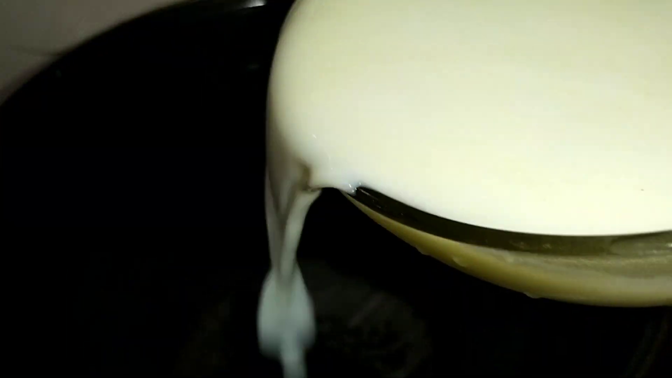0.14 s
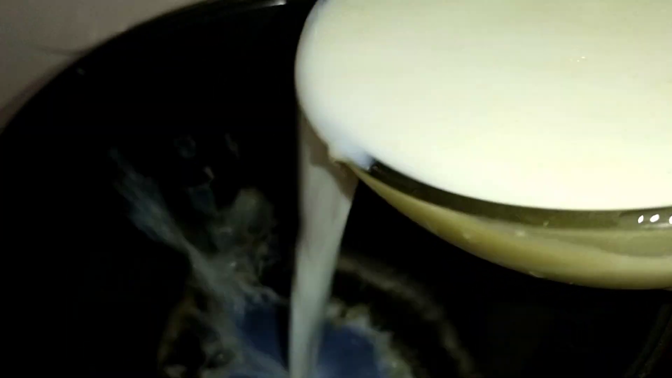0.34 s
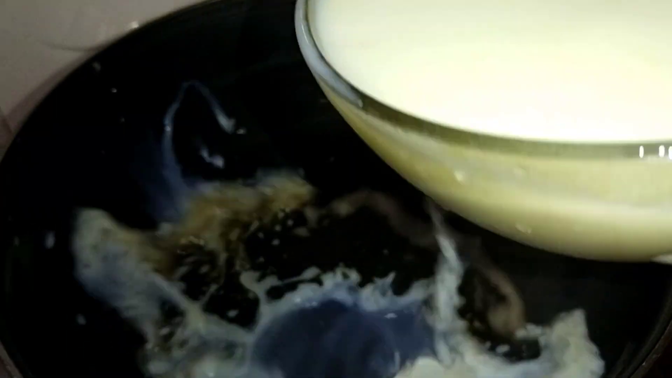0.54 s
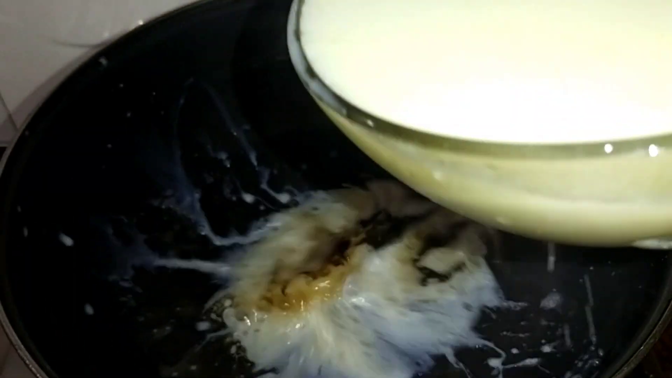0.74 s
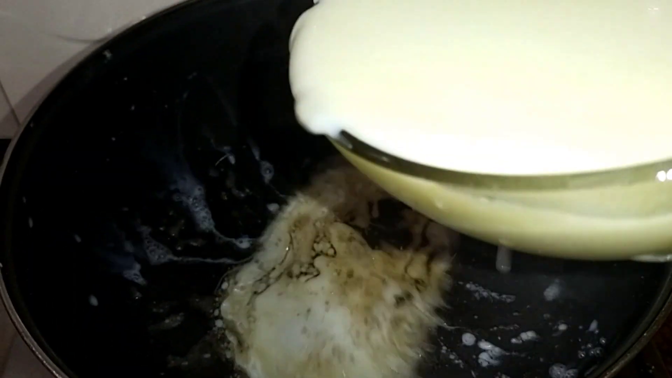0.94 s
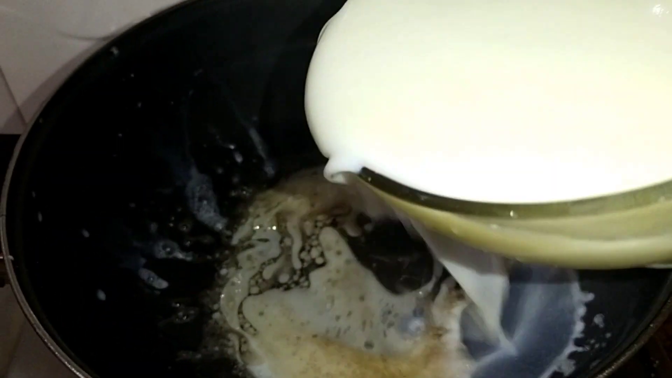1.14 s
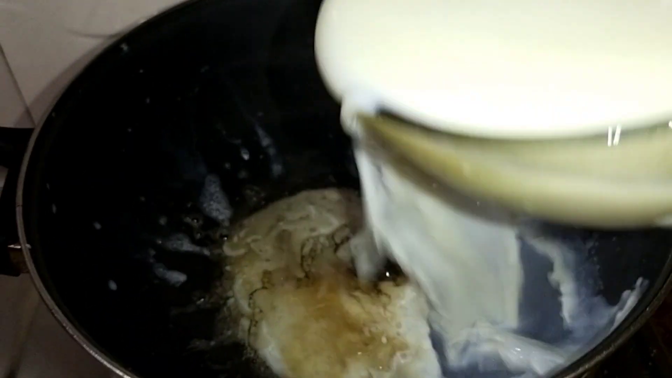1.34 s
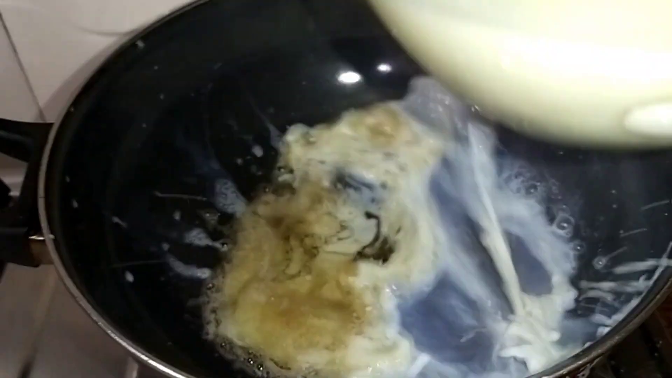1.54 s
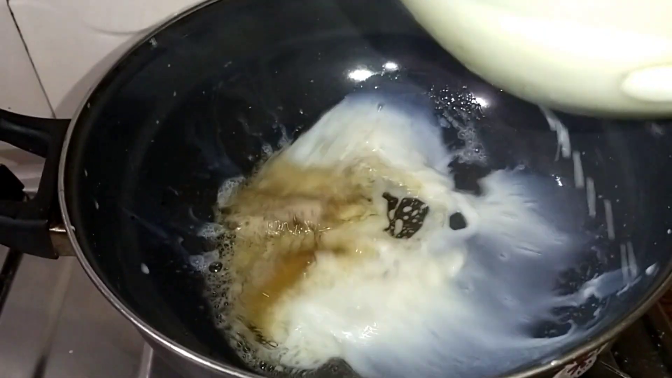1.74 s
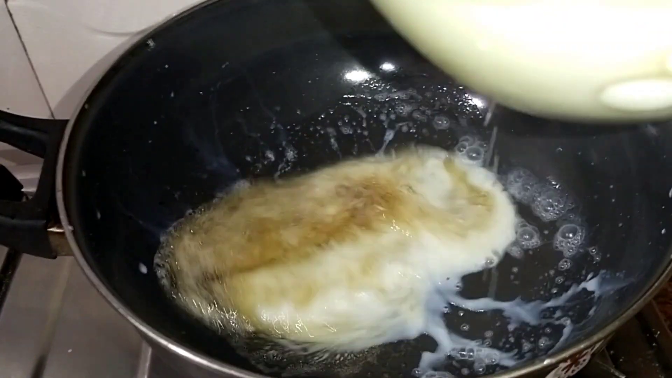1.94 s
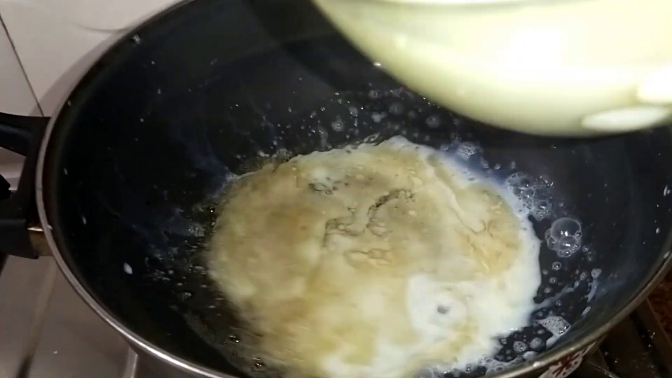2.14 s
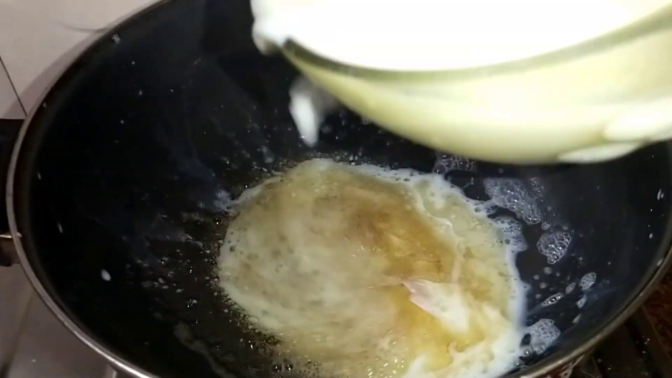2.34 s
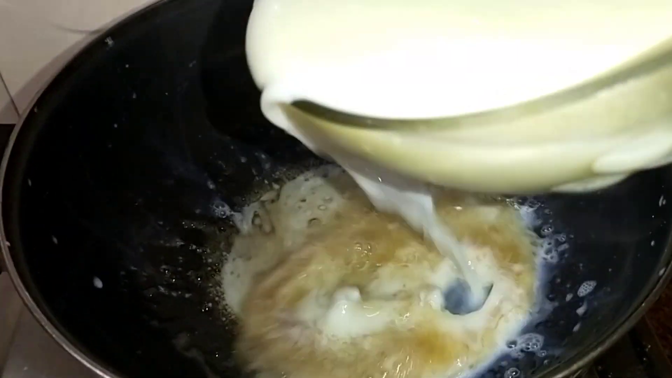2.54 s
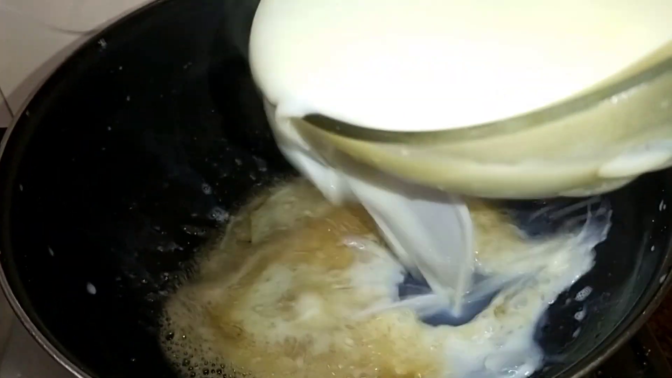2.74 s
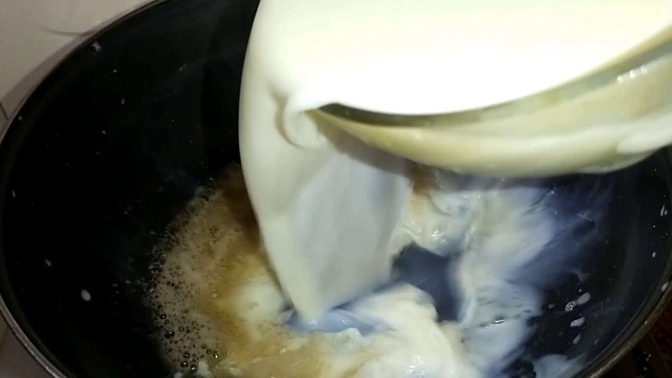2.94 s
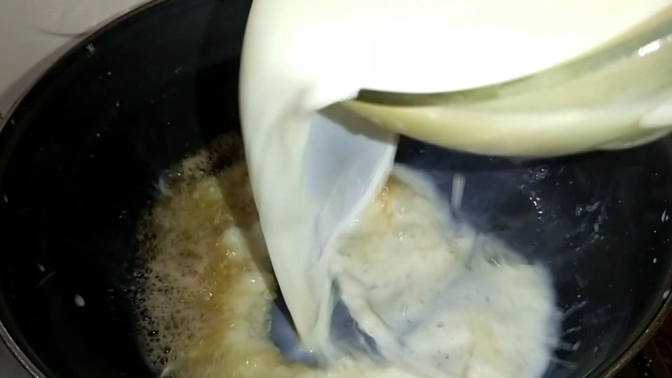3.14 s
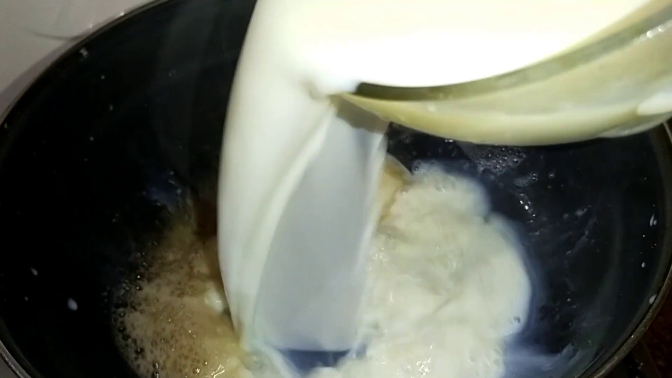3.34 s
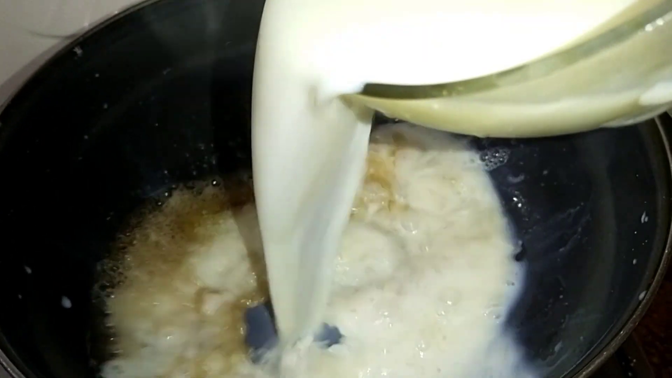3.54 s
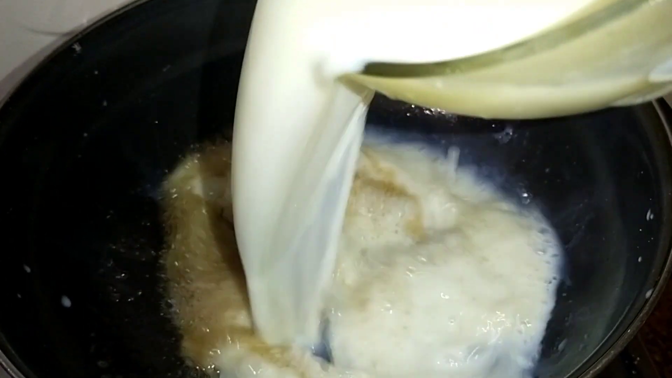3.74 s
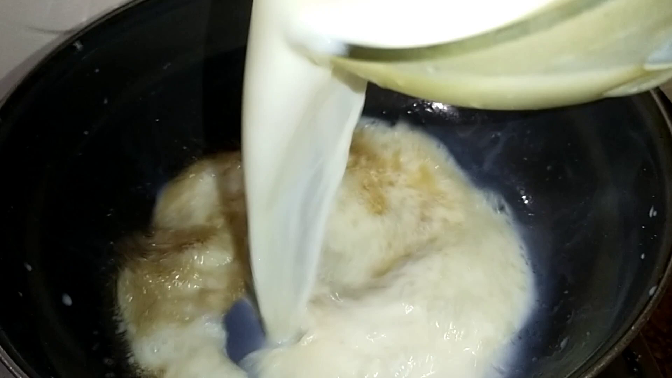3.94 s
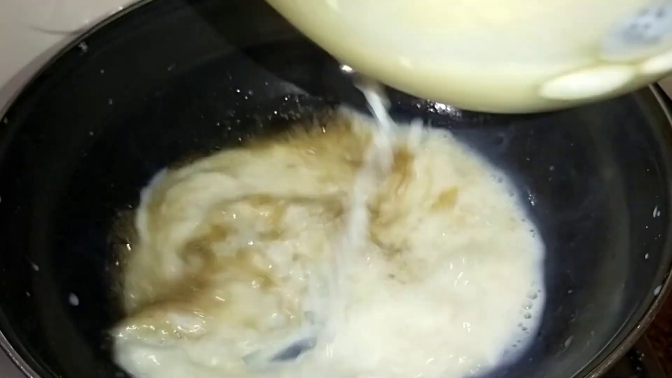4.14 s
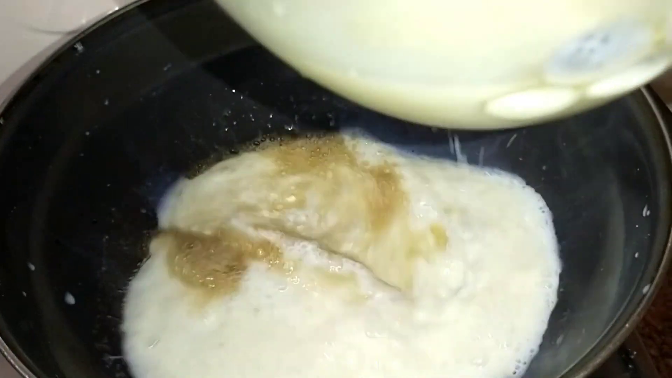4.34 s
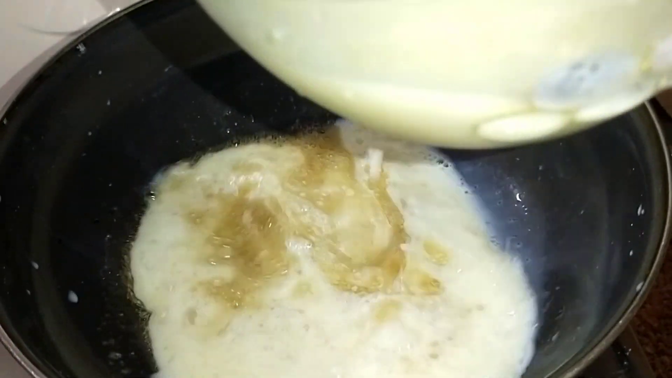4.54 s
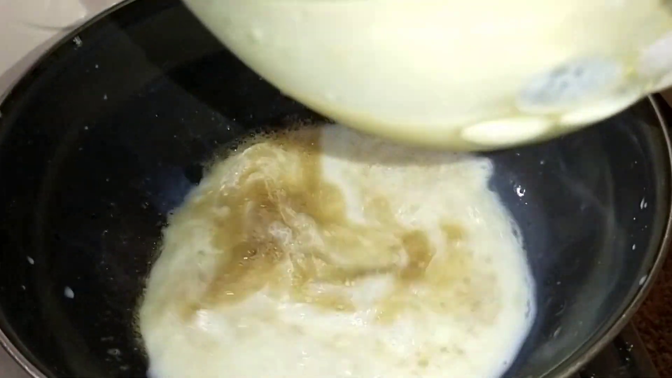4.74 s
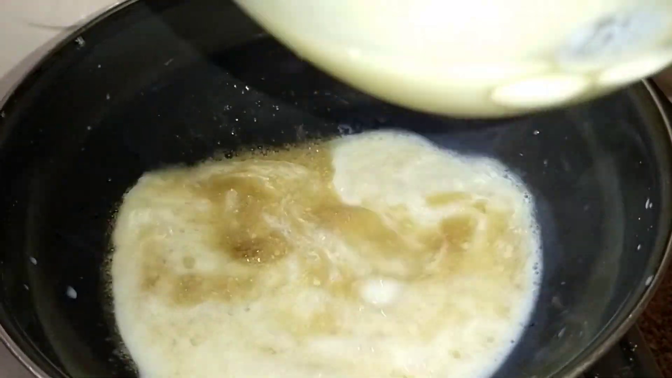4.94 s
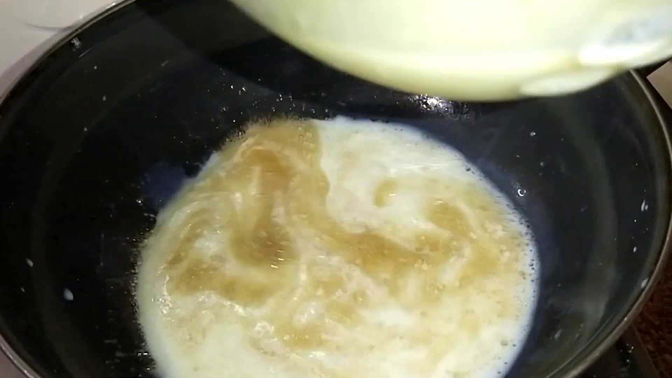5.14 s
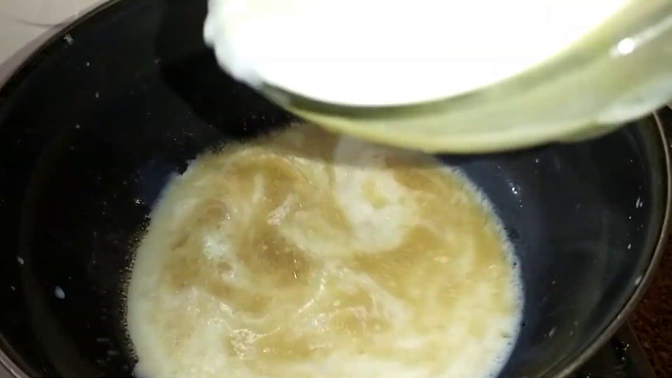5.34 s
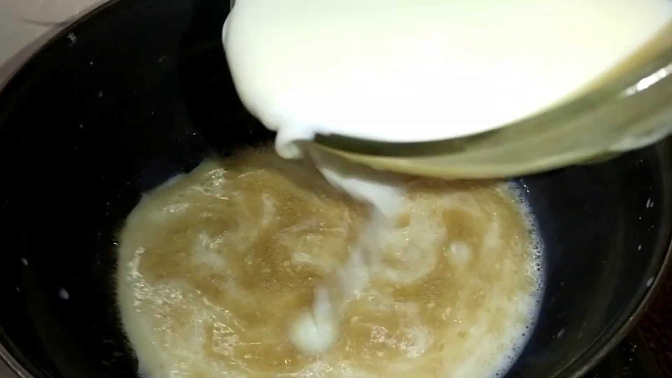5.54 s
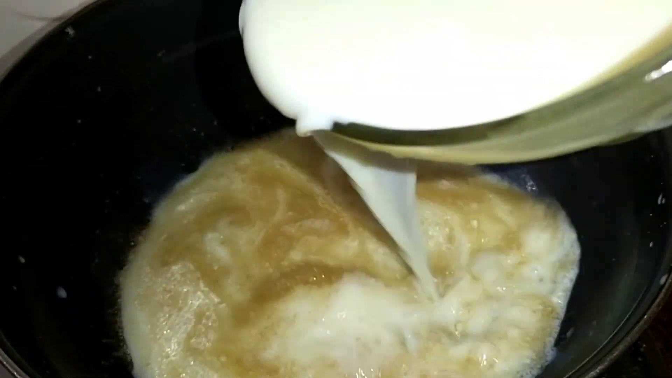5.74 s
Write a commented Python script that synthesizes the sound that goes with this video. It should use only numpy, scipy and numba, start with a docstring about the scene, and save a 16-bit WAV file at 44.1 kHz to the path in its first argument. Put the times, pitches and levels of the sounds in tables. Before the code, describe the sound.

A few isolated ticks, then milk meets hot ghee in a wok and a dense, bright sizzle bursts up within half a second. Sharp spits and low bubbling peak around one second, flare again with later pours, then die to a thin fizz with separate snaps over a faint stove drone. Very close stereo microphone, small hard-walled kitchen.

```python
"""Milk poured into hot ghee

Milk runs in several goes into a wok of hot ghee, close to two microphone ports in a small kitchen.
Droplets flash to steam and spit, a dense fizz spreads over the metal, and larger bubbles boil and ring the wok.
Most sounds are short damped rings or bursts of filtered noise, placed by tables or at random.
As the milk cools the pan the boiling dies away, leaving fizz and lone spits over the low drone of the stove."""
import sys
import numpy as np
from scipy import signal
from scipy.fft import rfft, irfft
from scipy.io import wavfile
from numba import njit

SR = 44100
rng = np.random.default_rng(int(sys.argv[2]) if len(sys.argv) > 2 else 0)


def generate_wav(signal):
    """Clip the signal to [-1, 1] and save it as 16-bit WAV at the path in sys.argv[1]."""
    frames = np.transpose(np.atleast_2d(signal))
    scaled = np.clip(frames, -1, 1) * 32767
    pcm = np.round(scaled).astype(np.int16)
    wavfile.write(sys.argv[1], SR, pcm)


N = 255603
TIME = np.arange(N) / SR  # seconds
WETTING_S = 0.33  # when the stream has wetted the pan
LEFT_LEAD_S = 0.0001  # the pan lies a little nearer to the left port


def undb(db):
    """Turn decibels into gain."""
    return 10 ** (np.asarray(db) / 20)


def unit(x):
    """Scale a sound to an average (rms) strength of 1."""
    return x / np.sqrt(np.mean(x ** 2))


def colour(x, points):
    """Shape the tone of two channels through (Hz, dB) points, with a filter that never sounds early."""
    hz, db = np.transpose(points)
    size = 2048
    grid_hz = np.arange(size // 2 + 1) * SR / size
    gain = undb(np.interp(np.log(grid_hz + 1), np.log(hz), db))
    # folding the cepstrum (spectrum of the log gain) puts the filter's energy at its start
    cepstrum = irfft(np.log(gain))
    cepstrum[1:size // 2] *= 2
    cepstrum[size // 2 + 1:] = 0
    response = irfft(np.exp(rfft(cepstrum)))
    return signal.fftconvolve(x, response[None], axes=1)[:, :N]


def resonate(x, hz, width):
    """Let through a band of this width in Hz, with gain 1 at its centre."""
    return signal.lfilter(*signal.iirpeak(hz, hz / width, fs=SR), x)


def walk(rate):
    """Random wander with a spread near 1, heading for a new value `rate` times a second."""
    return np.interp(TIME * rate, np.arange(4096), rng.standard_normal(4096))


@njit
def rings(start, hz, cycles, size, glide):
    """Sum of damped sines: each falls to 1/e in its cycles of hz; its pitch rises (falls if glide < 0)."""
    out = np.zeros(N)
    for k in range(len(start)):
        life = cycles[k] / hz[k]
        first = max(int(start[k] * SR) + 1, 0)
        last = min(int((start[k] + 6 * life) * SR), N)
        for i in range(first, last):
            t = i / SR - start[k]
            phase = 2 * np.pi * hz[k] * t * (1 + glide * t / life)
            out[i] += size[k] * np.exp(-t / life) * np.sin(phase)
    return out


def bubbles(count, low_hz, high_hz, cycles, scatter, linger_s, spread_s, glide):
    """Bubbles burst in clusters of six of like pitch; each cluster has its own place and lag between ports."""
    when, pitch, place, lean, vigour = np.repeat(rng.random((count, 5)), 6, axis=0).T
    late, detune, length, strength = rng.random((len(when), 4)).T
    start = when * N / SR - linger_s * np.log(1 - late)
    hz = low_hz * (high_hz / low_hz) ** pitch * (0.9 + 0.2 * detune)
    hz = np.minimum(hz, SR * 0.45)
    # with scatter above 0 a few bubbles are much louder than the rest, below 0 a few are much softer
    size_db = -scatter * (np.log(strength + 0.02) + np.log(vigour + 0.05))
    size = undb(size_db) * rng.choice([-1, 1], len(when))
    lag = LEFT_LEAD_S / 2 + (2 * place - 1) * spread_s
    return np.array([rings(start + side * lag / 2, hz, cycles * (0.5 + length),
                           size * (1 + side * (lean - 0.5)), glide) for side in (-1, 1)])


def wok(x):
    """The hollow of the pan adds its own notes, each a narrow resonance."""
    # hollow of the wok under the bowl: pitch_hz, width_hz, level_db
    notes = [(169, 8.1, 7.5), (232.5, 8.6, 8), (379, 18, -6), (403, 44, -3), (439, 41, -5), (549, 7.8, 1),
             (604.4, 22, 11), (696, 4.6, 12), (725.4, 14, 13), (925, 11, 2), (1094, 5.2, 10.5),
             (1172, 100, 5.5), (1494, 12, 1), (2070, 10, 0), (2254, 23, 2)]
    return 1.05 * x + sum(undb(db) * resonate(x, hz, width) for hz, width, db in notes)


def wetting():
    """Steep rise in dB as the first milk spreads over the pan; before it only single drops are heard."""
    slope_db_per_s = 518
    return slope_db_per_s * np.minimum(TIME - WETTING_S, 0)


def fizz_level():
    """Guide level of the fizz in dB: a slow fall as the pan cools, with flares that swell and die away."""
    # milk runs onto fresh hot metal and the fizz flares up: start_s, level_db, rise_s, fade_s
    flares = [(0.40, -26, 0.27, 1), (0.77, -25, 0.039, 0.44), (1.351, -28.5, 0.034, 0.12),
              (1.85, -28.5, 0.024, 0.17), (2.28, -30.5, 0.053, 0.63), (2.68, -30, 0.1, 0.033),
              (3.24, -31, 0.1, 0.31), (4.25, -34, 0.043, 0.23), (4.76, -38, 0.052, 0.31),
              (5.12, -36, 0.023, 0.27), (5.70, -35.5, 0.025, .15)]
    steady_db, cooling_db_per_s = -33, 1  # level without flares when the pan is wetted, and its fall
    power = undb(steady_db - cooling_db_per_s * (TIME - WETTING_S)) ** 2
    for s, db, rise_s, fade_s in flares:
        swell = np.clip((TIME - s) / rise_s, 0, 1)
        fade = np.exp(-np.maximum(TIME - s - rise_s, 0) / fade_s)
        power = power + (undb(db) * swell * fade) ** 2
    return 10 * np.log10(power) + wetting()


def frying():
    """Bubbles of three sizes, dry ticks, sharp crackles and a steam hiss, rising as milk meets hot metal."""
    # guide strength of the boiling in the body of the milk: time_s, level_db
    boiling = [(0.33, -54), (0.46, -33.5), (0.72, -40), (0.8, -33), (1.2, -34.5), (1.48, -32.5),
               (1.78, -39), (2.75, -40.5), (2.87, -44), (3.05, -40), (3.55, -45), (3.67, -40), (3.8, -43.5),
               (4.6, -46), (4.76, -54.5), (4.9, -52), (5.33, -49), (5.59, -60.5), (5.67, -52)]
    # guide strength of the churning, which settles when the pouring stops: time_s, level_db
    churning = [(0.33, -62), (0.5, -54.5), (0.72, -51.5), (0.8, -44.5), (1.45, -48.5), (1.78, -51),
                (1.9, -47.5), (2.3, -49.5), (3.1, -54.5), (3.35, -55.5), (3.8, -57.5), (4.18, -61.5),
                (4.27, -64), (4.6, -72), (4.88, -70.5), (4.93, -59.5), (5.0, -72.5), (5.63, -67.5),
                (5.66, -58.5), (5.79, -55)]
    # tone of the small fizzing bubbles: pitch_hz, level_db
    fizz_tone = [(300, -37), (1800, -32.5), (3500, -13.5), (5000, -9.5), (7000, -4.5), (9000, 3),
                 (12000, -4.5), (15500, -8.5)]
    # tone of the sharp crackles: pitch_hz, level_db
    crackle_tone = [(300, -53), (2000, -32), (5000, -1.5), (7500, -7), (9500, 0), (11500, -12.5),
                    (15500, -5)]
    # tone of the boiling and of the dry ticks: pitch_hz, level_db
    boil_tone = [(300, -20), (1500, -15), (2300, -5), (2900, -1.5), (5000, 1.5), (7500, 2.5), (11000, 3.5),
                 (15500, 4.5)]
    # tone of the large churning bubbles: pitch_hz, level_db
    churn_tone = [(60, -18), (230, -1), (310, -9), (400, 2.5), (720, -4.5), (950, -5.5), (1250, 1),
                  (1700, 8), (2200, 11.5), (3500, -2), (8000, -32)]
    # tone of the thin top hiss of steam: pitch_hz, level_db
    steam_tone = [(300, -53), (7000, -36), (10000, -6), (11500, -5.5), (15500, -5.5)]

    # guide levels, each with a slow random wander
    fizz_db = fizz_level() + 0.7 * walk(22.04)
    surge_db = 1.0 * walk(18)  # boiling and churning come in uneven surges
    boil_db = np.interp(TIME, *np.transpose(boiling)) + wetting() + surge_db
    churn_db = np.interp(TIME, *np.transpose(churning)) + wetting() + 1.85 * surge_db

    fizz = bubbles(count=7000, low_hz=4600, high_hz=13500, cycles=0.59, scatter=0.0,
                   linger_s=0.0008, spread_s=0.00021, glide=0.)
    fizz = colour(fizz, fizz_tone)
    crackle = bubbles(count=520, low_hz=7800, high_hz=10200, cycles=1.0, scatter=0.5,
                      linger_s=0.0054, spread_s=0.00018, glide=0.)
    crackle = colour(crackle, crackle_tone)
    boil = bubbles(count=7000, low_hz=2697, high_hz=14200, cycles=2.4, scatter=0.0,
                   linger_s=0.005, spread_s=0.00016, glide=0.0063)
    boil = colour(boil, boil_tone)
    # small dry ticks of bursting foam
    ticks = bubbles(count=480, low_hz=3300, high_hz=7600, cycles=0.69, scatter=-0.5,
                    linger_s=0.000298, spread_s=0.00019, glide=0.)
    ticks = colour(ticks, boil_tone)
    churn = bubbles(count=2400, low_hz=723, high_hz=2750, cycles=1.88, scatter=1.0,
                    linger_s=0.004, spread_s=0.00027, glide=0.063)
    churn = colour(wok(churn), churn_tone)

    # lone crackles stand out when the boiling has died down
    crackle_db = fizz_db - 20.5 + 0.23 * np.clip(fizz_db - boil_db - 8, -8, 8)
    flicker_db = 0.8 * walk(200)
    hiss = unit(fizz) * undb(fizz_db - 12.5 + flicker_db) + unit(crackle) * undb(crackle_db)
    # a thin jet of steam at the very top: -39 dB when the fizz guide is at -26, gaining 1.55 dB per dB
    steam = colour(rng.standard_normal((2, N)), steam_tone)
    hiss += unit(steam) * undb(-39 + 1.55 * (fizz_db + 26.0))
    foam = unit(boil) * undb(boil_db - 4.0 + flicker_db)
    foam += unit(ticks) * undb(boil_db - 10.5 + 2 * walk(30))  # the ticks' level is patchy
    return hiss + foam + unit(churn) * undb(churn_db - 3.5)


def lesser_spits(count):
    """Droplets burst at random moments, as strong as the fizz allows; same columns as the loudest spits."""
    moment, vigour, place, pitch = rng.random((count, 4)).T
    s = WETTING_S + moment * (TIME[-1] - WETTING_S)
    # 6 dB above the fizz guide, give or take 2.5 dB
    db = np.interp(s, TIME, fizz_level()) + 6 + 2.5 * (2 * vigour - 1)
    hz = 8670 + 2410 * (2 * pitch - 1)
    pan_db = 6 * (2 * place - 1)
    spray_db = np.full(count, -19)
    return list(zip(s, db, pan_db, spray_db, hz))


def spits():
    """A droplet flashes to steam with a sharp tick; its spray lands and crackles for a few milliseconds."""
    # the loudest droplets bursting in the fat, levels before the final tone shaping:
    # start_s, tick_db, left_minus_right_db, spray_db (from 6.5 dB below the tick), pitch_hz
    loudest = [(0.174, -38.5, 0, -5, 9550), (0.1985, -31, 1, -2.5, 9650), (0.203, -30.5, -2, -10, 9000),
               (0.2662, -23.5, 3, -6, 10400), (0.3203, -28.5, 5, -10, 7500), (0.365, -25, 1, -15, 8300),
               (0.391, -22, 2, -11, 8800), (0.468, -16.5, 2, -17, 9000), (0.4786, -18.5, -10, -19, 9050),
               (0.498, -23, -1, -19, 8630), (0.614, -17, 1, -23, 8340), (0.6266, -15, 0, -14, 9060),
               (0.6895, -18, 3, -5, 8500), (0.784, -9.5, 3, -16, 8830), (0.79, -5, 1.5, -3, 8900),
               (0.838, -12, -4, -15, 9050), (0.86, -10, -1.5, -14, 9050), (0.958, -13.5, -1, -0.5, 8400),
               (1.0064, -10, 5, -9, 9400), (1.0427, -10.5, -3, -8.5, 7500), (1.0685, -15, 0, -13, 8300),
               (1.111, -7, -3, -6, 9700), (1.147, -14.5, -4, -15, 8700), (1.2978, -13, -5, -17, 7900),
               (1.6158, -20, -3, -21, 9200), (1.701, -19, 2, -13, 8660), (1.7362, -16, 1, -14, 8600),
               (1.8614, -15, 4, -9, 8440), (1.886, -19, 2, -11, 9100), (2.342, -20, -2, -16, 9300),
               (2.3733, -15, 4, -17, 9600), (2.387, -16, 0, -15, 8950), (2.447, -14, -1, -8, 9300),
               (2.5624, -21, -2, -18, 9380), (2.608, -19, 1, -6, 9100), (2.6757, -14, -2, -10, 9400),
               (2.7173, -11.5, 4, -11, 8700), (2.734, -15.5, -1, -10, 8550), (2.895, -21.5, -3, -8, 7140),
               (2.9437, -18, -2, -6.5, 8700), (2.998, -19.5, 2, -9, 8600), (3.1177, -20, 2, -9, 9040),
               (3.392, -20, 0, -4.5, 8500), (4.182, -21, -11, -20, 9400), (4.265, -20, -3, -8, 8950),
               (4.32, -18.5, -10, -11.5, 9340), (4.4296, -14.5, 2, -31, 8400), (4.802, -19, -4, -26, 8400),
               (4.8158, -14.5, -3, -29, 8400), (4.826, -20, 0, -16, 9600), (4.832, -16.5, -2, -24, 8400),
               (4.855, -21.5, 0, -22, 8400), (4.864, -14, -1, -20, 8200), (4.914, -22, -2, -20, 8300),
               (4.9265, -14, -2, -13.5, 8200), (4.95, -24, -1, -20, 8250), (5.1565, -18, -4, -17, 8200),
               (5.178, -22, -2, -20, 8200), (5.237, -16, 0, -30, 8100), (5.258, -24, -4, -24, 10000),
               (5.2867, -12.5, -1, -30, 8550), (5.5754, -14.5, 3, -32, 8670), (5.623, -15, 4, -32, 8940),
               (5.6673, -11, 1, -16, 8500), (5.728, -24, 0, -20, 8400), (5.7342, -15.5, 3, -19, 8340),
               (5.737, -14, 2, -20, 8900), (5.7395, -16.5, 0, -18, 8700), (5.764, -24, 3, -11, 7900)]
    out = np.zeros((2, N))
    t = np.arange(SR // 10) / SR
    for s, db, pan_db, spray_db, hz in loudest + lesser_spits(count=75):
        spray = rng.standard_normal((2, len(t))) * undb(2.0 * rng.standard_normal(len(t)))
        # violent bursts are broad cracks, gentle ones keep close to their pitch
        width = np.clip(3600 * undb(2.8 * (db + 13.5)), 2500, 12000)
        spray = resonate(resonate(spray, hz, width), hz, 15000)
        spray = unit(spray) * np.exp(-t / 0.0071) * undb(spray_db - 6.5)
        for channel, side in enumerate((1, -1)):
            age = np.maximum(t - channel * LEFT_LEAD_S, 0)
            onset = 1 - np.exp(-2.2 * width * age)
            tick = np.sin(2 * np.pi * hz * age) * np.exp(-age / 0.00042) * onset
            burst = undb(db + side * pan_db / 2) * (tick + spray[channel])
            part = out[channel, int(s * SR):][:len(t)]
            part += burst[:len(part)]
    return colour(out, [(200, -24), (1500, -7), (3000, -4.5), (5000, -1.0),
                        (9000, -2.5), (12000, 0.5), (15500, -4)])


def splutters():
    """A droplet skates on hot metal: a rough burst of steam noise that swells quickly and fades more slowly."""
    # droplets skating on the hot metal: time_s (close to the peak), level_db, pitch_hz, fade_s
    skaters = [(0.256, -51, 6200, 0.005), (0.273, -45, 10700, 0.004), (0.302, -56, 3400, 0.0063),
               (0.337, -40, 7250, .004), (0.391, -50, 2860, 0.019), (0.566, -40, 8900, 0.0046),
               (0.648, -38, 9000, 0.0056), (0.703, -41, 9200, 0.0054), (0.742, -37, 9000, .004),
               (0.764, -32.5, 4070, 0.003), (0.889, -26.5, 9000, 0.0033), (0.949, -34, 9300, 0.0052),
               (0.977, -31, 9000, 0.002), (1.093, -32, 9300, 0.0029), (1.226, -35, 7250, 0.0035),
               (1.49, -41, 3200, 0.022), (1.78, -40, 3300, 0.0079), (2.189, -47, 3790, 0.0018),
               (2.388, -35, 3920, 0.0018), (2.767, -35.5, 3340, 0.0037), (2.874, -32, 6200, 0.0019),
               (2.998, -44, 4350, 0.0012), (3.063, -35, 3360, .0015),  (3.679, -45, 6000, 0.029),
               (4.378, -43.5, 8900, 0.0096), (4.479, -45, 8250, 0.019), (5.031, -45, 8500, 0.014),
               (5.16, -40, 8200, 0.0083), (5.477, -39.5, 9300, 0.0073), (5.513, -47, 9000, 0.0031),
               (5.541, -38, 8900, 0.0042), (5.62, -33, 8800, 0.0024), (5.713, -42, 9300, .005),
               (5.73, -50.5, 4400, 0.011), (5.767, -40, 7900, 0.0083)]
    width_hz, rough_db = 1600, 5.5  # filter width, and how unevenly it sputters
    out = np.zeros((2, N))
    for s, db, hz, fade_s in skaters:
        start = int(max(s - 0.06, 0) * SR)
        t = TIME[start:start + SR // 6] - s
        fade_s = max(fade_s, 0.001)
        swell = 2 / (np.exp(-2 * t / fade_s) + np.exp(t / fade_s))
        wander = np.interp(t, np.linspace(t[0], t[-1], 200), rng.standard_normal(200))
        noise = rng.standard_normal((2, len(t))) * undb(rough_db * wander)
        steam = resonate(resonate(noise, hz, width_hz), hz, width_hz)
        out[:, start:start + len(t)] += unit(steam) * swell * undb(db)
    return out


def squeaks():
    """Steam squeezed out from under droplets chirps briefly downward, as strong as the fizz allows."""
    chirps = bubbles(count=70, low_hz=6000, high_hz=13500, cycles=18, scatter=1,
                     linger_s=0.25, spread_s=0.0002, glide=-0.04)
    return unit(chirps) * undb(fizz_level() - 20)


def plops():
    """A pocket of steam collapses and breaks into smaller bubbles; part of the blow rings the wok."""
    # steam pockets collapsing in the milk, levels relative to one another:
    # start_s, level_db, pitch_hz, ring_cycles (at least 0.3 is used)
    pockets = [(0.791, -27, 1104, 1.7), (0.917, -20, 2090, 1.4), (0.929, -30.5, 2100, 7.1),
               (1.112, -31, 894, 0.79), (1.225, -34, 1100, 1.8), (1.243, -29.5, 1200, 0.46),
               (1.402, -23, 1264, 2.8), (1.403, -20.5, 1940, 1.2), (1.422, -28, 920, 0.77),
               (1.572, -31.5, 1770, 2.9), (1.829, -33, 1400, 1.3), (1.885, -32.5, 1860, 1.8),
               (2.326, -35.5, 1870, 5.8), (4.172, -42.5, 1570, 6.7), (5.655, -48.5, 1200, 1.7),
               (5.662, -45.5, 1936, 6.6), (5.666, -47.5, 1020, 0.79)]
    s, db, hz, cycles = np.transpose(pockets)
    out = np.ones((2, 1)) * rings(s, hz, np.maximum(cycles, 0.3), undb(db - 1.5), 0.016)
    for _ in range(8):  # smaller bubbles from each pocket
        late, pitch, place = rng.random((len(s), 3)).T
        for channel, side in enumerate((-1, 1)):
            start = s + 0.00594 * late + side * 0.00039 * (place - 0.5)
            out[channel] += rings(start, hz * (0.8 + 0.9 * pitch), np.full(len(s), 2.2),
                                  undb(db - 9.0), 0.012)
    return colour(out + undb(2.0) * wok(out), [(150, -29), (400, -12), (700, -14.5), (1200, -7),
                                             (2200, -3), (3000, -13), (6000, -14)])


def stream():
    """While the milk runs it drags under small air bubbles, each ringing with a short rising note."""
    # milk running from the bowl: start_s, end_s, level_db of its small bubbles
    pours = [(1.15, 1.7, -56), (2.688, 4.25, -62.5), (5.63, 5.9, -74)]
    ramp_s = 0.025  # how quickly the stream starts and stops
    flow = np.zeros(N)
    for start, end, db in pours:
        flow += undb(db) * np.clip(np.minimum(TIME - start, end - TIME) / ramp_s, 0, 1)
    small = bubbles(count=260, low_hz=1400, high_hz=3100, cycles=5.5, scatter=0.8,
                    linger_s=0.2, spread_s=0.0002, glide=0.008)
    return flow * unit(small)


def glugs():
    """Trapped air rings briefly, rising in pitch as it nears the surface."""
    # air bubbles dragged under by the stream: start_s, level_db, pitch_hz, ring_cycles
    trapped = [(2.311, -32, 4080, 12), (2.527, -32, 4450, 7.9), (2.80, -56, 598, 46), (2.84, -46, 2620, 14),
               (3.042, -44, 1270, 8.1), (3.275, -48, 1535, 25), (3.664, -51, 760, 14),
               (3.871, -51, 1610, 26), (4.18, -57.5, 820, 7.6)]
    s, db, hz, cycles = np.transpose(trapped)
    return rings(s, hz, cycles, undb(db), 0.0126)


def puffs():
    """The biggest bursts knock the wok and send a pressure step that leaks, swings back and trails eddies."""
    # puffs of steam pressing on the microphone: start_s, pressure_step_db, knock_db, eddies_db
    blasts = [(0.7894, -32.5, -27, -57), (1.111, -47, -33, -72), (2.6758, -43, -44, -63)]
    leak_s, swing_s, eddy_fade_s = 0.016, 0.11, 0.12
    steps, gust = np.zeros(N), np.zeros(N)
    for s, db, _, eddy_db in blasts:
        age = np.maximum(TIME - s, 0)
        swing = np.exp(-age / leak_s) - leak_s / swing_s * np.exp(-age / swing_s)
        steps += undb(db) * (1 - np.exp(-age / 0.00073)) * swing
        gust += undb(eddy_db) * (1 - np.exp(-age / 0.01)) * np.exp(-age / eddy_fade_s)
    # the air behind a puff keeps buffeting: noise mostly below 45 Hz
    low_pass = signal.butter(2, 45, fs=SR, output="sos")
    eddies = unit(signal.sosfilt(low_pass, rng.standard_normal((2, N))))
    s, _, knock_db, _ = np.transpose(blasts)
    knock = rings(s, np.full(len(s), 520.), np.full(len(s), 0.3), undb(knock_db), 0.)
    return wok(knock) - steps + gust * eddies


def kitchen(x, early_db, early_s, room_db, room_t60):
    """Add quick wok-to-bowl reflections, then a short tiled-wall ring; its lows reach both ports alike."""
    t = np.arange(SR // 2) / SR
    near, far = rng.standard_normal((2, 2, len(t)))
    near = near * np.exp(-t / early_s) * (t > 0.0007)
    far = far * np.exp(-np.log(1000) * t / room_t60) * (t > 0.005)
    mid, side = (undb(early_db) * unit(near) + undb(room_db) * unit(far)) / np.sqrt(2 * len(t))
    side = signal.sosfilt(signal.butter(1, 1200, "high", fs=SR, output="sos"), side)
    return x + signal.fftconvolve(x, np.array([mid + side, mid - side]), axes=1)[:, :N]


def stove():
    """A soft rush of air and a low drone near 100 Hz, both filtered noise, nearly the same at both ports."""
    # tone of the rushing air: pitch_hz, level_db
    air_tone = [(20, 8.5), (45, 1.5), (75, 6.5), (112, 1.5), (150, -4), (300, -13.5), (700, -18.5),
                (2000, -25.5), (8000, -33.5), (15500, -37)]
    # strength of the drone, before a small trim: time_s, level_db
    drone_levels = [(0, -104), (0.5, -75.5), (2.2, -77), (3.3, -71), (4.4, -70.5), (4.7, -68.5),
                    (5.6, -65.5), (5.8, -79)]
    air = rng.standard_normal(N) + 0.5 * rng.standard_normal((2, N))
    drone = resonate(resonate(air, 104, 21), 86, 47)
    drone_db = np.interp(TIME, *np.transpose(drone_levels)) - 0.5
    return unit(colour(air, air_tone)) * undb(-69) + unit(drone) * undb(drone_db)


def scene():
    """Everything in the pan sounds into the kitchen, over the stove."""
    pan = frying() + spits() + splutters() + squeaks() + plops() + stream() + glugs() + puffs()
    return kitchen(pan, early_db=-9, early_s=0.006, room_db=-11, room_t60=0.25) + stove()


def record(dry):
    """Each microphone port rings in the high treble; peaks beyond full scale clip and the top is cut."""
    # microphone ports, left then right: pitch_hz, width_hz, boost_db (strength of the added ring)
    ports = [(8150, 970, 7.5), (9090, 1700, 5.5)]
    ported = np.array([x + undb(db) * resonate(x, hz, width)
                       for x, (hz, width, db) in zip(dry, ports)])
    top_cut = signal.ellip(10, 0.2, 90, 15700, fs=SR, output="sos")  # steep cut above 15700 Hz
    return signal.sosfilt(top_cut, np.clip(ported, -1, 1))


dry = scene()
out = record(dry)
generate_wav(out)
```